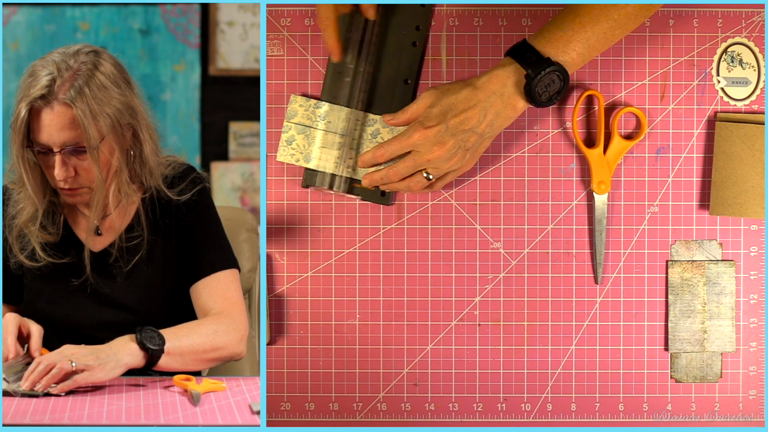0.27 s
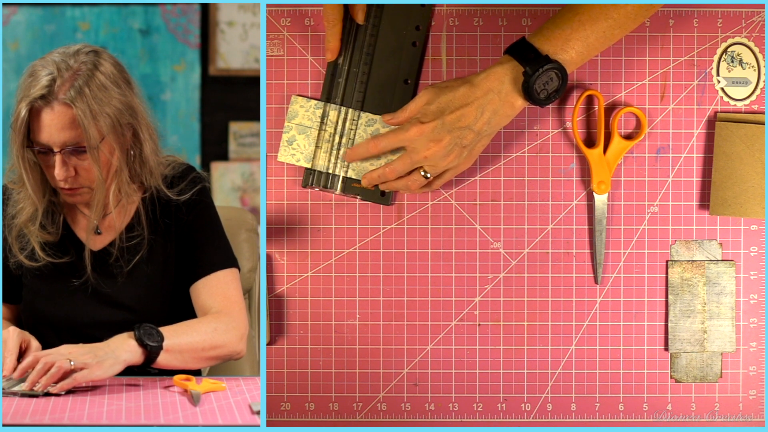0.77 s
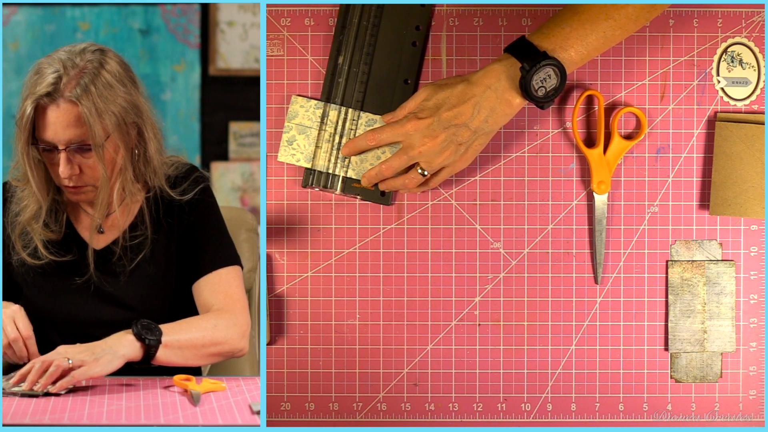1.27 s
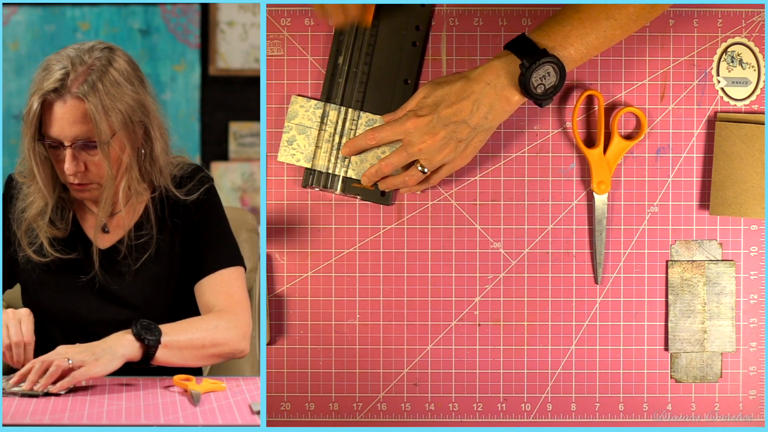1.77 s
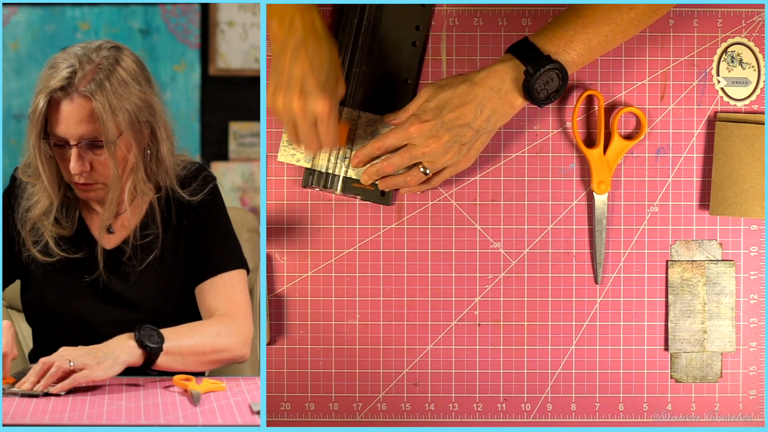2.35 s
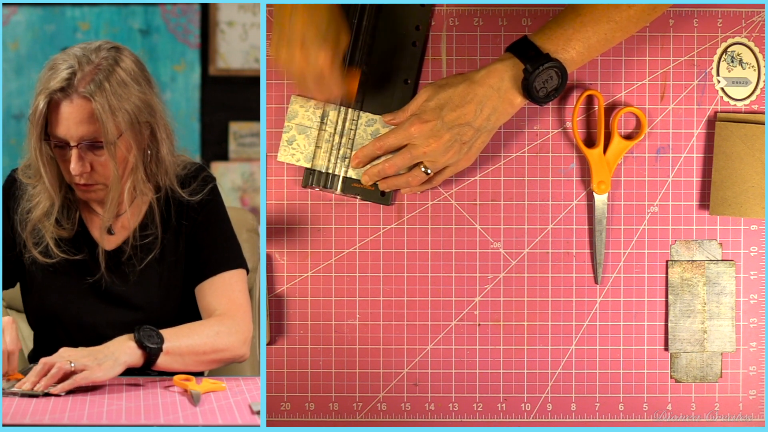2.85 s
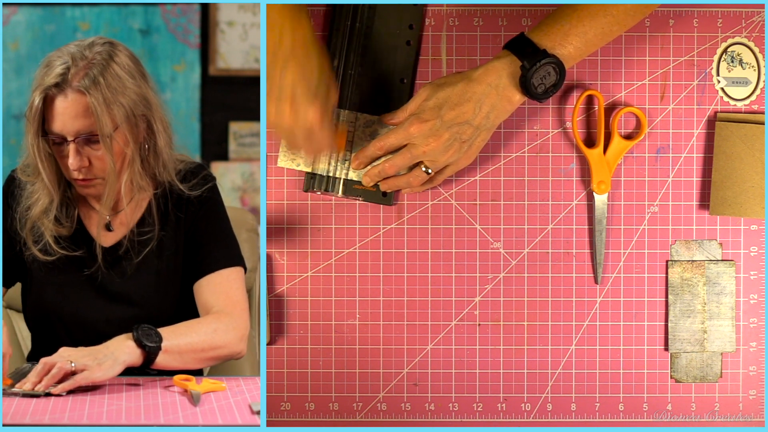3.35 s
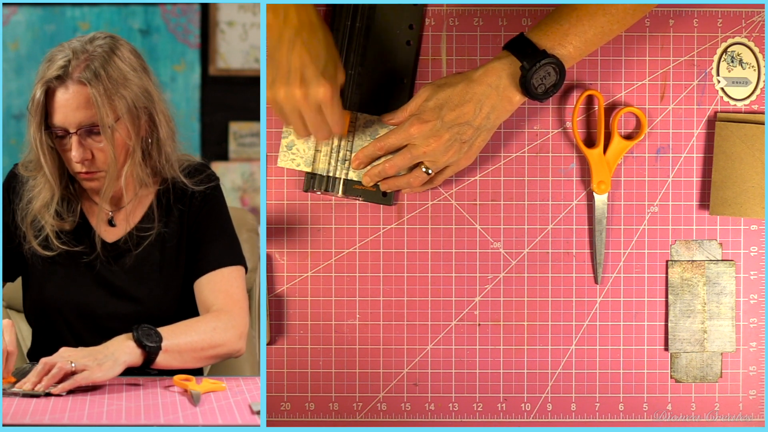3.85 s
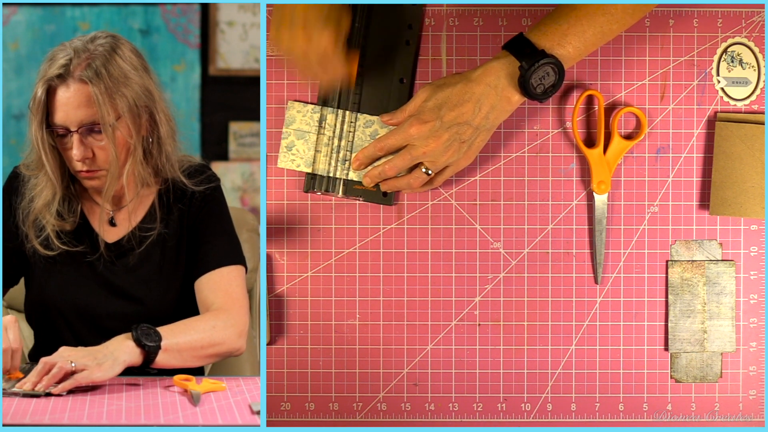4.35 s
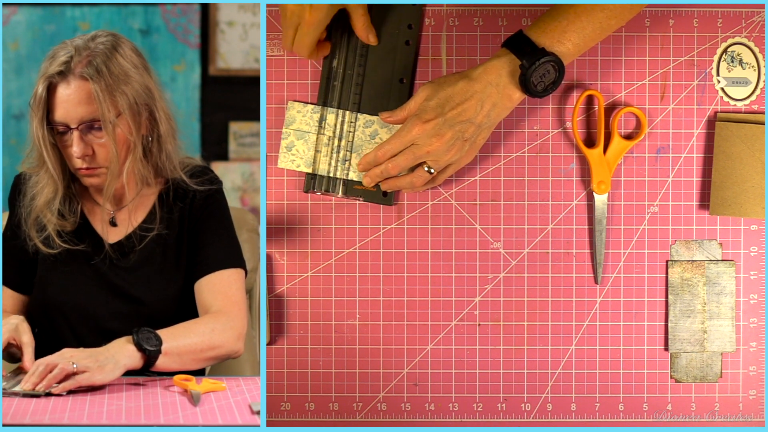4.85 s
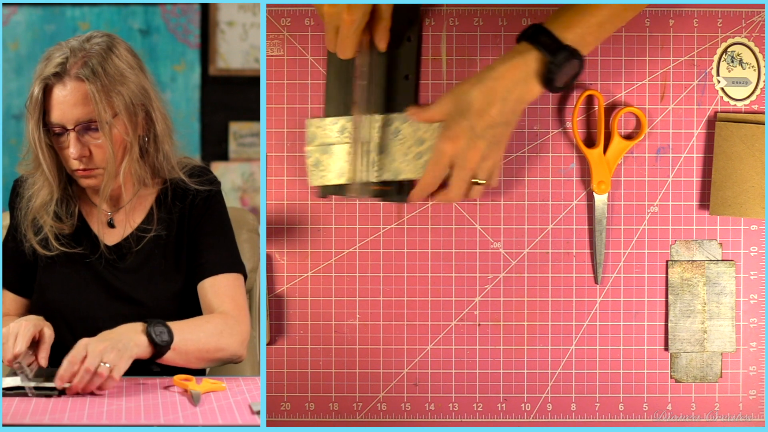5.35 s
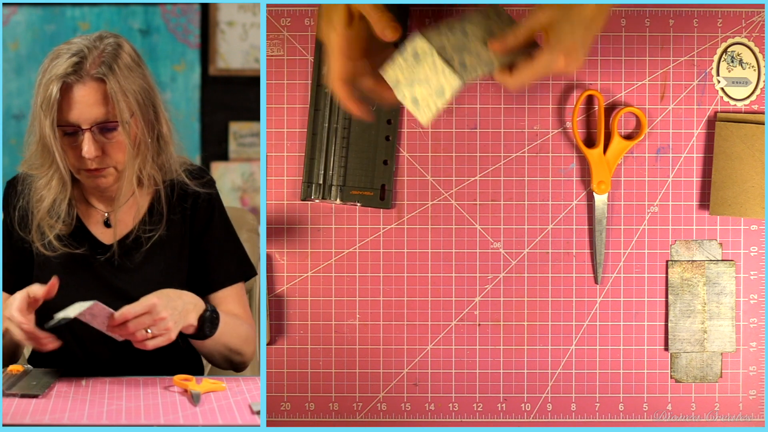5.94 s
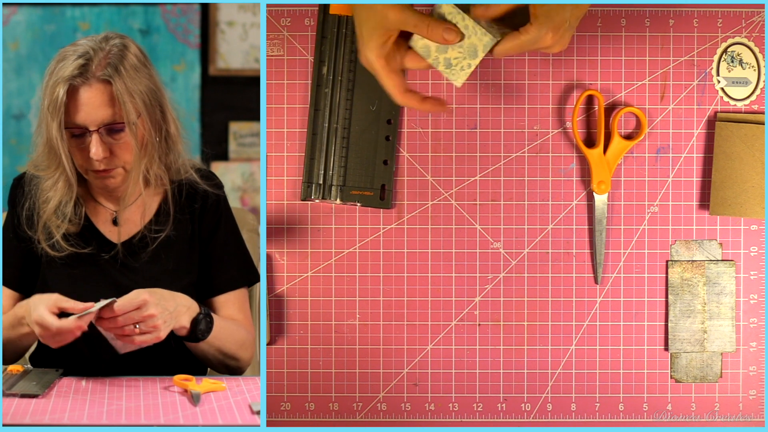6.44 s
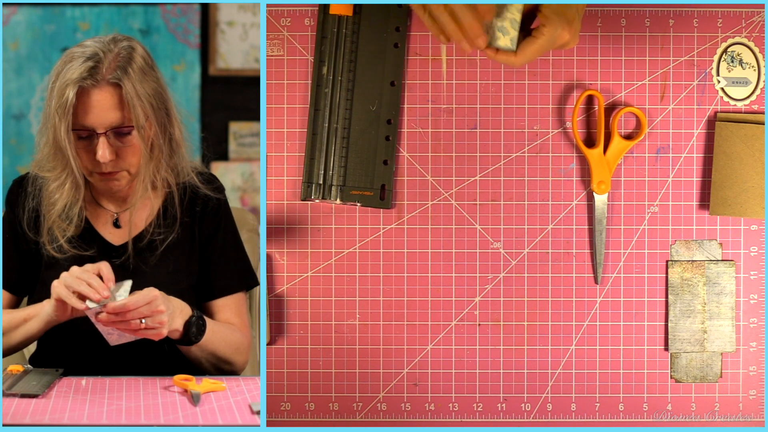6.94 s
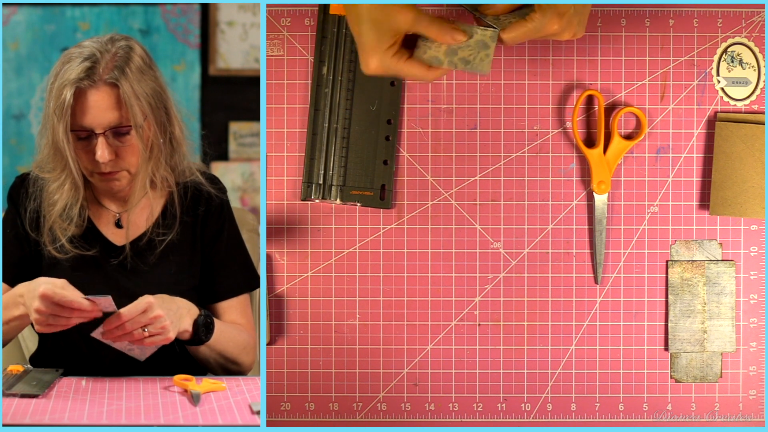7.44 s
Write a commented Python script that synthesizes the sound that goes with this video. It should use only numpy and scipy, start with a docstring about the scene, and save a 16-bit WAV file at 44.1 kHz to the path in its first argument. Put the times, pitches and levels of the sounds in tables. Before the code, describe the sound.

A plastic paper trimmer's carriage scratches back and forth, knocking at its stop, then the card slides out, the rail clacks shut and card creases.

```python
"""A craft desk in a quiet room, heard from close by, with a short dull tail from the walls.
A card is lined up in a plastic sliding trimmer; the carriage runs up and down its rail, knocking at the end stop.
The card is drawn out, the guide rail drops shut and bounces, and fingers fold the card.
Knocks and snaps are noisy contacts ringing modes plus a bright crack; rubbing and sliding are shaped random grains.
The room rumbles below, in filtered noise, with a faint wavering hum of gliding tones."""
import sys
import numpy as np
from scipy import signal
from scipy.fft import rfft, irfft
from scipy.io import wavfile

SR = 44100
rng = np.random.default_rng(int(sys.argv[2]) if len(sys.argv) > 2 else 0)


def inscribe(sig):
    """Save sig as 16-bit PCM at rate SR to the path in sys.argv[1].

    A 1-D sig is mono; a 2-D sig holds one channel per row.
    Samples are clipped to [-1, 1] before scaling.
    """
    pcm = np.round(np.clip(np.atleast_2d(sig).T, -1, 1) * 32767)
    wavfile.write(sys.argv[1], SR, pcm.astype(np.int16))


N = 339555

# room air spectrum: (frequency [Hz], relative level [dB])
AIR_SPECTRUM = [(18, 3.5), (40, -0.5), (60, -11), (120, -9), (200, -15), (350, -19.5), (600, -30),
                (850, -23), (1300, -34.5), (2000, -43.5), (3500, -49.5), (8000, -50), (12000, -54.5),
                (16000, -67.5)]
AIR_DB = -56
# desk rumble under the hands: (time [s], level [dB])
DESK_RUMBLE = [(0.0, -75), (0.7, -67), (1.3, -59.5), (2.6, -52.5), (3.7, -57.5), (4.15, -51), (4.7, -57.5),
               (5.9, -57), (6.4, -63.5), (7.7, -61)]

# faint rubbing that goes on while the card is held: (time [s], dull rub [dB], bright rustle [dB])
HELD_CARD = [(0, -82.5, -95), (1.3, -84, -93), (1.65, -65.5, -78), (4.45, -76, -85), (5.15, -65.5, -75),
             (5.9, -69, -79), (6.5, -68.5, -70.5), (7.1, -76, -76), (7.7, -75, -83)]
# card rubbed on tray and fingers: (fastest at [s], length [s], dull rub [dB], bright rustle [dB])
CARD_RUBS = [(0.228, 0.052, -70.5, -69.5), (0.375, 0.19, -74.5, -86), (0.658, .14, -75, -82),
             (1.39, 0.15, -69.5, -85), (4.584, 0.069, -54.5, -64), (4.767, 0.1, -48, -63),
             (5.194, 0.043, -60, -60.5), (5.298, 0.22, -52, -56.5), (5.438, 0.16, -48, -49.5),
             (5.529, .26, -48, -43.5), (5.787, 0.11, -51, -54), (6.092, 0.054, -54, -61.5),
             (6.228, 0.072, -51, -47.5), (6.308, 0.096, -64.5, -60.5), (6.68, 0.08, -66, -67.5),
             (6.79, 0.2, -62.5, -64), (6.919, 0.04, -55.5, -58.5), (7.035, 0.077, -67, -67),
             (7.101, .07, -66.5, -72.5), (7.234, 0.24, -73, -85), (7.53, 0.13, -69, -63),
             (7.642, 0.18, -68.5, -59.5)]
RUB_RISE_SHARE = 0.49  # part of a rub spent speeding up
# rubbing through the sheet: (frequency [Hz], relative level [dB])
DULL_SPECTRUM = [(150, -37.5), (250, -3), (730, -5.5), (900, -2.5), (1280, -3.5), (2250, -4.5), (2660, -9),
                 (3500, -18.5), (4550, -47.5), (7700, -120)]
# rustle at the sheet's surface: (frequency [Hz], relative level [dB])
RUSTLE_SPECTRUM = [(1650, -34.5), (2800, -13), (3560, -3), (4180, -9.5), (6770, 0.5), (7550, -5),
                   (9330, -6.5), (14900, -27.5), (16000, -26)]

# knocks on the trimmer: (time [s], body peak [dB], crack against the body [dB])
TRIMMER_KNOCKS = [(0.054, -47, -20), (0.367, -46.5, -24), (0.531, -43.5, -31), (0.63, -46.5, -22),
                  (0.647, -44, -7), (0.655, -33.5, -15.5), (1.017, -48, -12), (1.104, -37, -24),
                  (1.115, -38.5, -24), (1.354, -40, -41), (1.592, -40.5, -31), (1.608, -29, -17),
                  (1.621, -26, -16.5), (2.157, -35.5, -7), (2.207, -43, -17), (2.561, -15, -10.5),
                  (2.625, -35, -18), (2.676, -39, -31), (2.971, -39, -10.5), (3.049, -31.5, -9),
                  (3.091, -35, -13), (3.194, -13.5, -5.5), (3.347, -36, -21), (3.536, -36, -16),
                  (3.592, -35.5, -12), (3.631, -38, -32), (3.791, -39.5, -33), (4.062, -34.5, -15),
                  (4.107, -17.5, -7), (4.226, -40, -11), (4.642, -43, -30), (4.671, -38.5, -15),
                  (4.723, -37, -5), (4.729, -22, 2), (4.753, -31.5, 8.5), (4.784, -36.5, -17),
                  (4.817, -42.5, -13), (4.936, -26, -10), (4.996, -38, -25), (5.078, -45, -21),
                  (5.11, -45, -11.5), (5.293, -31.5, 2.5), (5.43, -29.5, -22), (5.749, -38, -9.5)]
# ringing modes of the plastic tray: (frequency [Hz], level [dB], full 60 dB decay time [s])
TRAY_MODES = [(254, -16.5, 0.074), (469.6, -6.5, 0.11), (640, -13, 0.052), (832, -3, 0.052),
              (1093, -2, 0.053), (1313, -2, 0.07), (1470, -1, 0.058), (1817, -1.5, 0.025),
              (1963, -6, 0.076), (2178, -8.5, 0.077), (2482, -2, 0.055)]
# bright resonances of a tray crack: (frequency [Hz], width [Hz], level [dB])
TRAY_CRACK_MODES = [(3900, 160, -7), (4800, 220, -3), (5350, 440, 2), (5650, 1100, -1), (7570, 430, -5.5),
                    (8280, 990, -12.5), (11000, 3600, -28.5)]

# faint tones, each swelling and fading: (start [s], length [s], first pitch [Hz], last pitch [Hz], level [dB])
HUM_TONES = [(.62, 0.57, 200, 213, -63), (1.75, 0.67, 108, 108, -63), (1.954, 1.2, 218, 198, -62)]

# carriage strokes, pushed away and pulled back in turn:
# (start [s], length [s], speed at the end of the run against its start [ratio], tray rattle [dB], blade hiss [dB])
CARRIAGE_STROKES = [(1.6, .64, 0.73, -56.5, -60.5), (2.17, .42, 1.59, -50.5, -55),
                    (2.66, .3, 1.13, -50.5, -54.5), (2.955, .31, 0.6, -44.5, -52),
                    (3.27, .225, 0.95, -49.5, -58), (3.485, .225, 0.87, -56, -58.5),
                    (3.705, .225, 1.11, -48, -58), (3.925, .225, 1, -50.5, -60.5),
                    (4.145, .42, 1.71, -45, -55.5)]
PUSH_RISE_S, PUSH_FALL_S = 0.14, 0.1
PULL_RISE_S, PULL_FALL_S = 0.089, 0.083
# hiss of the blade in its groove: (frequency [Hz], relative level [dB])
BLADE_SPECTRUM = [(2600, 1.5), (3300, -7), (4200, -1.5), (5500, 2), (6500, -10.5), (8200, 20.5),
                  (9300, -7.5), (10500, -6), (12000, -10.5), (13800, -11), (16000, -21)]

# rail drops and bounces: (time [s], body peak [dB], crack against the body [dB])
RAIL_DROPS = [(5.853, 4.5, 1), (5.876, -15.5, -12.5), (5.894, -7, 0), (5.904, -15.5, -11),
              (5.916, -13.5, -11), (5.926, -23.5, -17)]
# ringing modes of the guide rail: (frequency [Hz], level [dB], full 60 dB decay time [s])
RAIL_MODES = [(130, -20, .2), (196, -28, 0.12), (414, -23, 0.022), (580, -23, 0.21), (860, -11.5, 0.093),
              (1160, -11.5, 0.063), (1441, -5.5, 0.069), (1575, -0.5, 0.046), (1822, -6, 0.056),
              (2093, -9, 0.12), (2452, -7.5, .05), (2525, -6.5, 0.068), (2826, -16, .025)]
# bright resonances of a rail crack: (frequency [Hz], width [Hz], level [dB])
RAIL_CRACK_MODES = [(4070, 220, -3), (4930, 320, -5), (5750, 300, 0.5), (7540, 1100, -7.5),
                    (7470, 250, 0.5), (8070, 460, -6.5), (10390, 1200, -13.5), (13000, 4700, -23.5)]

# creases of the card snap: (time [s], body peak [dB], crack against the body [dB])
CARD_SNAPS = [(6.073, -42.5, 4), (6.091, -37, -14), (6.285, -54, 9), (6.306, -42, -2), (6.35, -29.5, -21.5),
              (6.406, -33.5, -25), (6.493, -28, -9), (6.531, -42, -1.5), (6.549, -55.5, 11.5),
              (6.659, -37.5, -17), (6.675, -43, -14), (6.686, -46, -4), (6.705, -22.5, -11.5),
              (6.765, -32.5, -7), (6.781, -24, -11), (6.89, -49, -10), (7.015, -35.5, -8.5),
              (7.037, -44, -7), (7.05, -42, -21), (7.144, -45, -19), (7.156, -48, -22)]
# ringing modes of the card: (frequency [Hz], level [dB], full 60 dB decay time [s])
CARD_MODES = [(368, -1.5, 0.033), (795, -36, .025), (1400, 13, 0.015), (1790, 4, 0.015),
              (2460, -0.5, 0.026)]
# bright resonances of a card crack: (frequency [Hz], width [Hz], level [dB])
CARD_CRACK_MODES = [(3900, 2000, -9), (7470, 1700, 2.5), (8800, 2900, -1.5), (13100, 2800, -17)]

# a firm blow presses the parts together and rings shorter:
# factors on the decay times for (a table's softest blow [ratio], its hardest [ratio])
TRAY_RING, RAIL_RING, CARD_RING = (0.77, 0.48), (0.75, 0.34), (0.94, 0.79)
# a crisp blow favours the upper modes: tilt in dB per octave about PIVOT_HZ for each dB of crack above the usual
TILT_PER_DB, USUAL_CRACK_DB, PIVOT_HZ = 0.5, -12.5, 1200

WALLS_T60_S, WALLS_DB, WALLS_HZ = 0.11, -15.5, 4630
CUTOFF_HZ = 15750


def amp(db):
    """Decibels to gain."""
    return 10 ** (np.asarray(db) / 20)


def rms_one(x):
    """Scale to unit rms."""
    return x / np.sqrt(np.mean(x ** 2) + 1e-20)


def butter(x, order, hz, kind):
    """Butterworth filter of the given kind."""
    return signal.sosfilt(signal.butter(order, hz, kind, fs=SR, output="sos"), x)


def flicker(depth_db, rate_hz):
    """A gain that wanders at random by depth_db: twice low-passed noise at every 20th sample."""
    r = np.exp(-2 * np.pi * rate_hz * 20 / SR)
    noise = rng.standard_normal(N // 20 + 3002)
    slow = signal.lfilter([1], [1, -2 * r, r * r], noise)[3000:]  # past the filter's start
    return np.interp(np.arange(N) / 20, np.arange(len(slow)), amp(depth_db * rms_one(slow)))


def grains(per_s, spread_db):
    """Random clicks of uneven size and either sign, at unit rms."""
    sizes = amp(spread_db * np.minimum(rng.exponential(1, N), 5))
    chance = rng.uniform(-1, 1, N)
    return rms_one(sizes * np.sign(chance) * (np.abs(chance) < per_s / SR))


def resonate(x, hz, width_hz):
    """One resonance, gain 1 on top."""
    r = np.exp(-np.pi * width_hz / SR)
    feedback = [1, -2 * r * np.cos(2 * np.pi * hz / SR), r * r]
    return signal.lfilter([(1 - r * r) / 2, 0, (r * r - 1) / 2], feedback, x)


def coloured(sources, spectrum, together_db, patchy_db, patch_rate):
    """Bands of about a third octave, from two sources in turn, each with its level and flicker; rms 1."""
    hz, db = np.transpose(spectrum)
    edges = np.geomspace(hz[0], hz[-1], int(3 * np.log2(hz[-1] / hz[0])) + 2)
    out = 0
    for k, (low, high) in enumerate(zip(edges, edges[1:])):
        band = butter(sources[k % 2], 2, [low, high], "band")
        band_db = np.interp(np.log(low * high) / 2, np.log(hz), db)
        out = out + band * amp(band_db) * flicker(patchy_db, patch_rate)
    return rms_one(out * flicker(together_db, patch_rate))


def strokes(rows, dull_power, bright_power):
    """Each stroke speeds up, runs and slows down; both levels follow a power of its speed."""
    t, dull_energy, bright_energy = np.arange(N) / SR, np.zeros(N), np.zeros(N)
    for s, rise, hold, fall, last_speed, dull_db, bright_db in rows:
        turns = np.cumsum([s, rise, hold, fall])
        span = slice(round(s * SR), round(turns[-1] * SR))
        ease = np.sin(np.pi / 2 * np.interp(t[span], turns, [0, 1, 1, 0]))
        speed = ease * np.interp(t[span], turns[1:3], [1, last_speed])
        dull_energy[span] += (amp(dull_db) * speed ** dull_power) ** 2
        bright_energy[span] += (amp(bright_db) * speed ** bright_power) ** 2
    return np.sqrt(dull_energy), np.sqrt(bright_energy)


def blows(rows, modes, crack, rings_for, contact_s, crack_t60, spread_db, detune, chatter, bass_hz):
    """Each blow is a short scuffle of contacts: it rings the low modes and sets off a fast bright crack."""
    out, t = np.zeros(N + 3300), np.arange(3300) / SR
    # loose parts split every mode in five
    hz, mode_db, t60 = np.repeat(np.transpose(modes)[:, :, None], 5, axis=1)
    peaks_db = np.array(rows)[:, 1]
    for s, db, crack_db in rows:
        ring = np.interp(db, [peaks_db.min(), peaks_db.max()], rings_for)
        crispness_db = np.clip(crack_db - USUAL_CRACK_DB, -15, 8)
        tilt_db = TILT_PER_DB * crispness_db * np.log2(hz / PIVOT_HZ)
        strengths = amp(mode_db + tilt_db + spread_db * rng.standard_normal(hz.shape))
        # the grip differs from blow to blow
        pitch = hz * (1 + detune * rng.standard_normal(hz.shape))
        decays = amp(-60 * t / (t60 * ring))
        rings = np.sum(strengths * decays * np.sin(2 * np.pi * pitch * t), axis=0)

        press = t / contact_s * np.exp(-t / contact_s)
        press = press + chatter * np.exp(-t / (contact_s * 8 * ring))  # loose parts chatter on
        contacts = rng.standard_normal(1800) * press[:1800]
        body = signal.fftconvolve(rings, contacts)[:len(t)]

        burst = rng.standard_normal(len(t)) * np.minimum(t / contact_s, 1) * amp(-60 * t / (crack_t60 * ring))
        # alternate signs between neighbouring resonances
        bright = sum(amp(d) * (-1) ** k * resonate(burst, f, w) for k, (f, w, d) in enumerate(crack))
        at = round(s * SR)
        blow = body / np.abs(body).max() + amp(crack_db) * bright / np.abs(bright).max()
        out[at:at + len(t)] += amp(db) * blow
    return butter(out[:N], 2, bass_hz, "high")  # the blows carry no deep bass


def background():
    """Steady room air as shaped noise, and a low lumpy rumble carried by the desk."""
    hz, db = np.transpose(AIR_SPECTRUM)
    bins = np.arange(1, N // 2 + 2) * SR / N
    shape = amp(np.interp(np.log(bins), np.log(hz), db)) * (bins > hz[0])
    air = irfft(rfft(rng.standard_normal(N)) * shape, N)
    low = butter(rng.standard_normal(N), 2, [22, 90], "band")
    lumps = rms_one(low * flicker(3.0, 2.5))
    desk_gain = amp(np.interp(np.arange(N) / SR, *np.transpose(DESK_RUMBLE)))
    return amp(AIR_DB) * rms_one(air) + desk_gain * lumps


def card_rub():
    """Fibres catch and let go: uneven grains, dull through the sheet and bright at its surface."""
    rubs = []
    for fastest_s, length, *db in CARD_RUBS:
        rise = RUB_RISE_SHARE * length
        rubs.append((fastest_s - rise, rise, 0, length - rise, 1, *db))  # rubs never run steady
    dull_gain, bright_gain = strokes(rubs, dull_power=0.63, bright_power=2.11)
    s, *held_db = np.transpose(HELD_CARD)
    held_dull, held_bright = (amp(np.interp(np.arange(N) / SR, s, db)) for db in held_db)
    fibres = [grains(5000, spread_db=4.0), grains(5000, spread_db=2.0)]
    dull = coloured(fibres, DULL_SPECTRUM, together_db=2.5, patchy_db=2.5, patch_rate=25)
    bright = coloured(fibres, RUSTLE_SPECTRUM, together_db=1.15, patchy_db=3.5, patch_rate=24)
    return np.hypot(dull_gain, held_dull) * dull + np.hypot(bright_gain, held_bright) * bright


def trimmer_knocks():
    """Knocks ring the plastic tray's short modes under a bright crack."""
    return blows(TRIMMER_KNOCKS, TRAY_MODES, TRAY_CRACK_MODES, TRAY_RING, contact_s=0.0016, crack_t60=0.029,
                 spread_db=4.0, detune=0.08, chatter=0.073, bass_hz=286)


def hum():
    """Faint low tones, steady or gliding, that come and go with a random waver."""
    out, t = 0, np.arange(N) / SR
    for s, length, first_hz, last_hz, db in HUM_TONES:
        along = np.clip((t - s) / length, 0, 1)
        phase = 2 * np.pi * np.cumsum(first_hz + (last_hz - first_hz) * along) / SR
        swell = np.abs(np.sin(np.pi * along))
        out = out + np.sqrt(2) * amp(db) * swell * np.sin(phase)
    return out * flicker(5.8, 19)


def slide_strokes():
    """A push gathers speed slowly, a pull sooner; then the carriage runs on, its speed drifting."""
    rows = []
    for k, (s, length, *rest) in enumerate(CARRIAGE_STROKES):
        rise, fall = (PULL_RISE_S, PULL_FALL_S) if k % 2 else (PUSH_RISE_S, PUSH_FALL_S)
        rows.append((s, rise, max(length - rise - fall, 0), fall, *rest))
    return rows


def carriage():
    """Ridges of the rail shake the tray's modes in uneven bursts while the blade hisses in its groove."""
    rattle_gain, hiss_gain = strokes(slide_strokes(), dull_power=1.0, bright_power=1.55)
    ridges = grains(1500, spread_db=2.0) * flicker(3.8, 35)
    lone_catches = grains(45, spread_db=2.5)
    shake = ridges + 0.54 * lone_catches
    rattle = 0
    for k, (hz, db, t60) in enumerate(TRAY_MODES):
        # each mode's share wanders at random, so the colour of the rattle keeps shifting
        share = amp(db) * flicker(3.1, 19.0) / hz ** 0.54 * (-1) ** k
        rattle = rattle + share * resonate(shake, hz, 17.0 / t60)  # far broader than a free ring
    rattle = butter(rattle, 4, 3000, "low")  # the plastic passes little above its top mode

    groove = [grains(9900, spread_db=4.0), grains(10000, spread_db=2.5)]
    hiss = coloured(groove, BLADE_SPECTRUM, together_db=1.46, patchy_db=1.96, patch_rate=13.4)
    edge = butter(hiss, 2, 9500, "high")
    # up to -64 dB, the highest hiss grows faster than the rest
    brightness = np.minimum(hiss_gain / amp(-64), 1) ** 0.18
    return rattle_gain * rms_one(rattle) + hiss_gain * (hiss - (1 - brightness) * edge)


def rail_drop():
    """The guide rail falls shut and bounces, ringing its own modes with a longer chatter."""
    return blows(RAIL_DROPS, RAIL_MODES, RAIL_CRACK_MODES, RAIL_RING, contact_s=0.0017, crack_t60=0.048,
                 spread_db=2.0, detune=0.049, chatter=0.17, bass_hz=100)


def card_snaps():
    """Creases snap with very brief contacts, ringing the card's quickly damped modes."""
    return blows(CARD_SNAPS, CARD_MODES, CARD_CRACK_MODES, CARD_RING, contact_s=0.00038, crack_t60=0.012,
                 spread_db=1, detune=0.077, chatter=0.047, bass_hz=200)


def walls(x):
    """A short diffuse tail, dull, starting after the first reflection."""
    t = np.arange(int(0.4 * SR)) / SR
    tail = rng.standard_normal(len(t)) * amp(-60 * t / WALLS_T60_S) * (t > 0.004)
    dull = np.exp(-2 * np.pi * WALLS_HZ / SR)
    tail = signal.lfilter([1 - dull], [1, -dull], tail)
    return signal.fftconvolve(x, tail / np.sqrt(np.sum(tail ** 2)))[:N]


def scene():
    """Trimmer and card close by, their wall tail, and the hum and air of the room."""
    near = card_rub() + trimmer_knocks() + carriage() + rail_drop() + card_snaps()
    return (near + amp(WALLS_DB) * walls(near) + hum() + background())[None]


def record(dry):
    """The microphone signal: the loudest peaks are flattened, the top is cut."""
    ceiling = 0.72
    flattened = ceiling * np.tanh(dry / ceiling)
    return signal.sosfilt(signal.ellip(10, 0.5, 60, CUTOFF_HZ, fs=SR, output="sos"), flattened)


dry = scene()
out = record(dry)
inscribe(out)
```